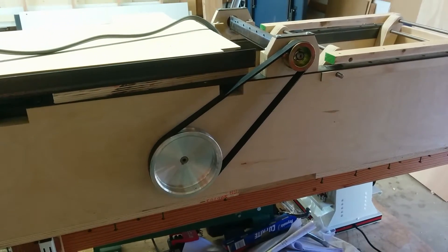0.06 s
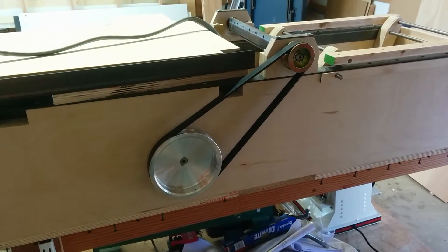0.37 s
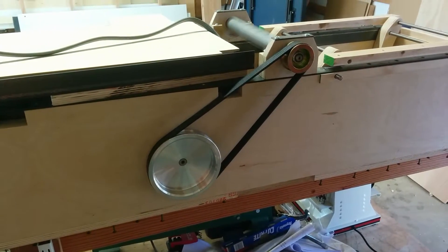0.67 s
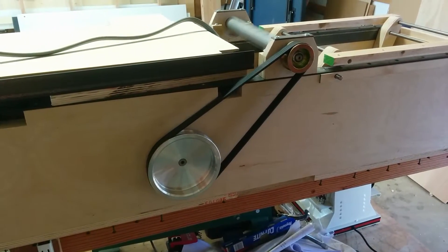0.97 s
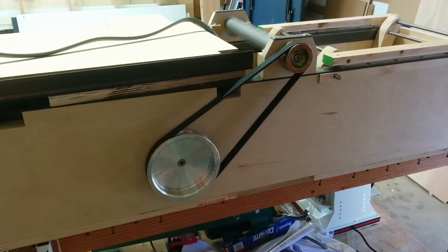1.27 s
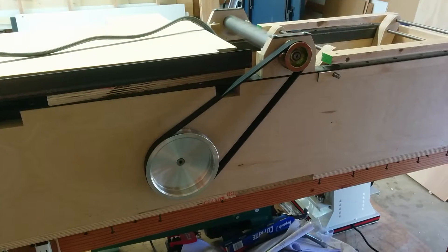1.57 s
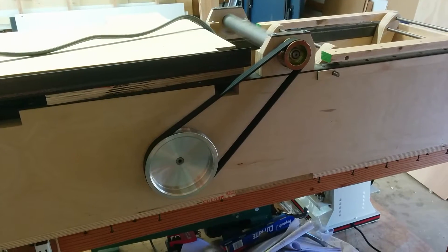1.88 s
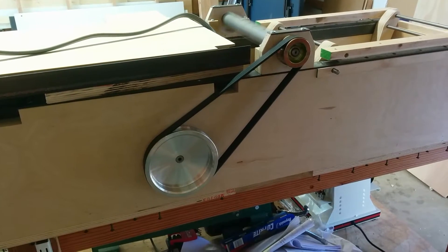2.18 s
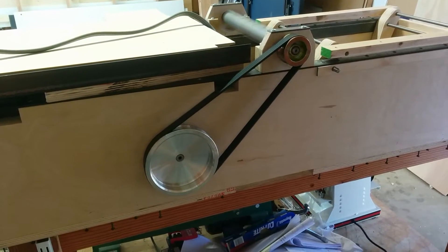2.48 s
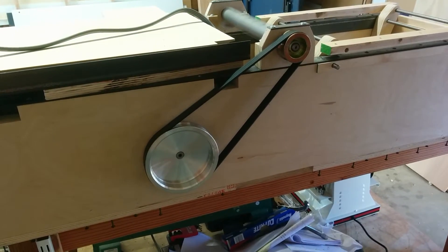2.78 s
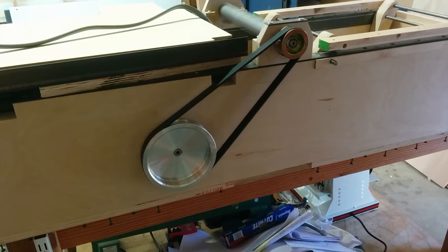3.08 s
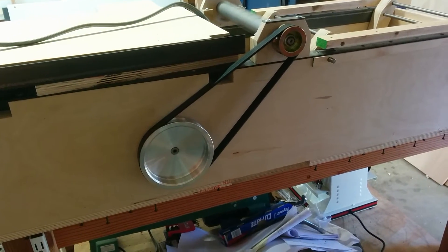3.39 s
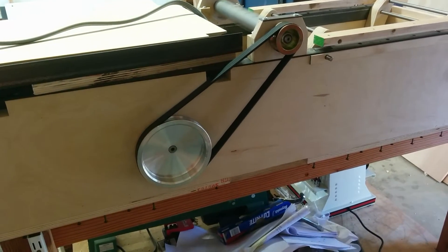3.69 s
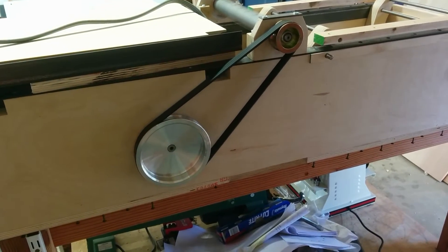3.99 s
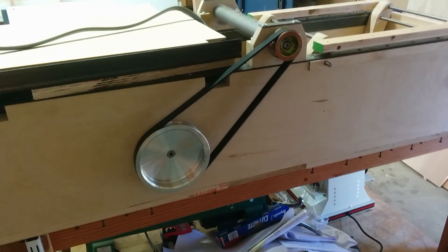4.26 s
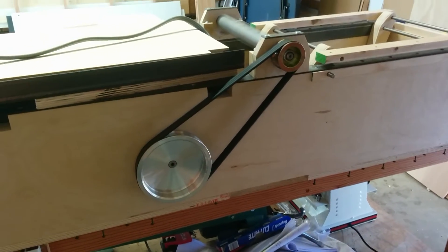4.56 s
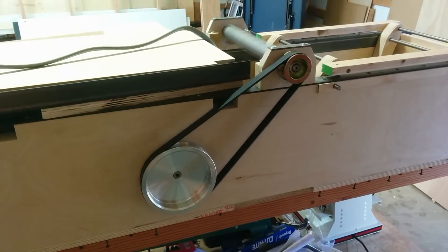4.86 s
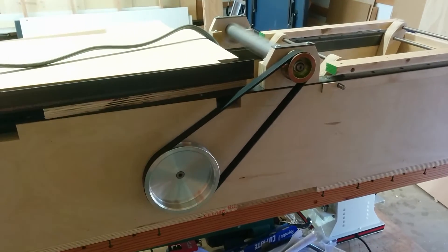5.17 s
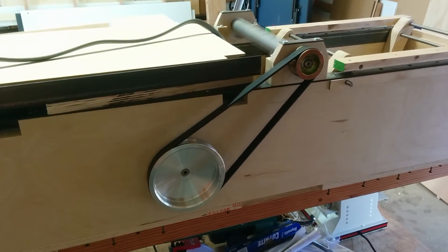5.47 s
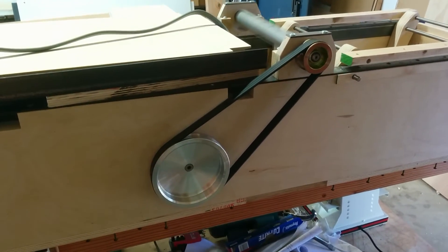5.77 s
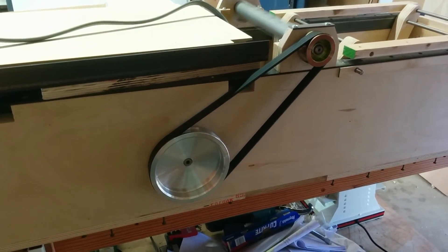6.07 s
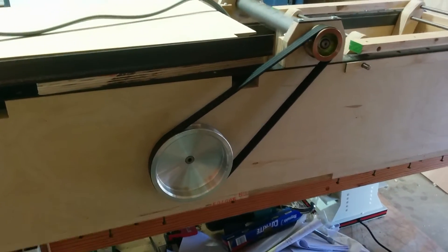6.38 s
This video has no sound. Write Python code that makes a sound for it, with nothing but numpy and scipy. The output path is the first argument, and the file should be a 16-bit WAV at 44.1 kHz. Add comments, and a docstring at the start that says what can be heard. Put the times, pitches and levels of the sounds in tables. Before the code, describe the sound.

In a quiet workshop, a switch snaps and an electric motor growls and whines quickly up to speed. Its drive belt squeals briefly and scuffs against the pulley for about a second before gripping. The machine then runs with a steady, throbbing hum, while its wooden frame rattles and knocks and the belt chirps and swishes unevenly, all heard from nearby.

```python
"""An induction motor starts up and drives the big pulley of a wooden woodworking machine by a V-belt.
Its switch snaps on, the inrush current growls, the rotor whines up and the starting switch drops out.
The belt squeals and slips until the pulley has caught up, then chirps and swishes in its groove.
Shafts, bearings and mains hum beat against each other while the frame rattles, in a small workshop."""
import sys
import numpy as np
from scipy import signal
from scipy.fft import rfft, irfft
from scipy.io import wavfile

SR = 44100
rng = np.random.default_rng(int(sys.argv[2]) if len(sys.argv) > 2 else 0)


def pcm_store(signal):
    """Save signal as 16-bit PCM."""
    levels = np.round(np.clip(np.atleast_2d(signal), -1, 1) * 32767)
    wavfile.write(sys.argv[1], SR, levels.astype(np.int16).T)


N = 284004
T = np.arange(N) / SR
HZ = np.maximum(np.fft.rfftfreq(N, 1 / SR), 1)
MOTOR_HZ, PULLEY_HZ, MAINS_HZ, POWER_ON_S = 59.58, 28.812, 60, 0.574

# run-up of each shaft, the last row being full speed: time_s, relative_speed
MOTOR_SPEED = [(.574, 0.23), (.62, 0.19), (.68, .27), (.72, .35), (.765, 0.45), (.81, 0.54), (.87, .645),
               (.92, .77), (.98, 0.86), (1.08, 0.91)]
PULLEY_SPEED = [(.6, 0.011), (.8, 0.46), (1.0, .85), (1.15, 0.91)]
def run_up(speeds):
    """A shaft's share of its full speed."""
    return curve(speeds) / speeds[-1][1]

def inrush():
    """The starting current, 0-1: it stays high until the rotor is nearly up to speed."""
    return np.clip((T - POWER_ON_S) / 0.022, 0, 1) ** 2 * (1 - run_up(MOTOR_SPEED) ** 40)

# housing resonances that the whine sweeps through: pitch_hz, width_hz, lift_db
HOUSING_MODES = [(275, 30, 14), (375, 48, 9), (448, 27.5, 14.5), (560, 20, 14.5), (670, 52, 2),
                 (750, 25, 6.5), (880, 76, 3)]
# magnetic growl of the inrush current: mains_multiple, level_db
GROWL_HARMONICS = [(2, -17), (4, -5.5), (6, -7.5), (8, -22.5), (14, -34)]
def motor_start(motor):
    """Rotor bars whine upward, with sidebands from the pulsing field; the inrush current growls."""
    speed = run_up(MOTOR_SPEED)
    bars, field = 16 * motor, 2 * MAINS_HZ * T
    lower = undb(-9.5 + 11.5 * speed ** 2) * tone(bars - field + 0.17 * walk(37))
    upper = undb(-14) * tone(bars + field + 0.2 * walk(40))
    whine = tone(bars + 0.08 * walk(40)) + lower + upper
    whine *= undb(2 * tone(motor))  # the off-centre rotor thickens it once a turn
    whine = undb(-24 - 7.2 * speed) * resonate(whine, HOUSING_MODES)
    growl = sum(undb(db + 0.71 * walk(22)) * tone(k * MAINS_HZ * T + 0.075 * walk(44))
                for k, db in GROWL_HARMONICS)
    growl = undb(-18 - 3.6 * speed) * unit(growl)
    # the housing is too small to radiate deep bass
    return signal.sosfilt(signal.butter(4, 200, "high", fs=SR, output="sos"), inrush() * (whine + growl))

# tones of each shaft: turn_multiple, level_db
MOTOR_ORDERS = [(1, -59.5), (2, -48), (3, -49), (5, -42), (6, -39), (8, -47), (13, -51), (16, -52)]
PULLEY_ORDERS = [(7, -43.5), (10, -49.5), (12, -44.5), (13, -44), (14, -49), (16, -42), (19, -47.5),
                 (21, -50), (22, -52.5), (25, -52), (28, -56.5), (29, -53.5), (30, -53.5), (31, -48.5),
                 (33, -54.5), (43, -56.5), (44, -55)]
def shafts(motor, pulley):
    """Both shafts sing and throb with the frame, over a boom that beats at the 4th motor order."""
    orders = tones(motor, MOTOR_ORDERS, flutter_db=1.5) + tones(pulley, PULLEY_ORDERS, flutter_db=4)
    boom = undb(-32 + 1.7 * walk(6.2)) * surge() * load(0.65) * tone(4 * motor, boom_beat())
    return throb(0.33) * load(0.8) * lull(0.48) * orders + boom

BEARING_HZ, PULLEY_BEARING_HZ, WHISTLE_HZ = 151.4, 467.2, 2622
# faint bearing tones and high motor harmonics at full speed: pitch_hz, level_db
FAINT_TONES = [(302.7, -40), (434.1, -45.5), (592.3, -49), (715, -52), (756.8, -53.5), (808, -55.5),
               (934.4, -53), (953.3, -51.5), (1192.5, -53), (1312, -57.5), (1497, -63.5), (1728, -63)]
# faders of the three lead tones: time_s, motor_bearing_db, hum_db, pulley_bearing_db
LEAD_LEVELS = [(1.15, -27, -44, -33), (1.96, -28.5, -27, -36), (2.75, -36.5, -39.5, -36),
               (3.15, -33.5, -31, -40), (4.66, -39.5, -33, -39), (5.05, -38, -40.5, -38),
               (5.64, -31, -30.5, -35), (5.95, -36.5, -41, -29.5), (6.44, -28.5, -50, -27)]
def running_tones(motor):
    """Bearings, high motor harmonics and a whistle follow the speed; the magnetic hum holds its pitch."""
    spin = motor / MOTOR_HZ
    faint = tones(spin, FAINT_TONES, flutter_db=4) + undb(-46.5) * tone(2 * MAINS_HZ * T)
    leads = (tone(BEARING_HZ * spin, drone_beat()), tone(6 * MAINS_HZ * T, lull(1)),
             tone(PULLEY_BEARING_HZ * spin))
    swelling = sum(undb(curve(LEAD_LEVELS, i) + 3 * walk(21)) * x for i, x in enumerate(leads, 1))
    whistle = undb(-53.5 + 1.7 * walk(6.9)) * load(1) * tone(WHISTLE_HZ * spin)
    return throb(0.11) * lull(0.26) * faint + swelling + whistle

# the motor under strain: pitch_hz, level_db (relative to the belt's scuffing)
STRAIN_TONES = [(301.5, -3), (468.3, -6), (1190.5, -9.5), (1238, -10), (1265, -13.5), (2762, -19.5),
                (3187, -17), (3741, -21.5), (4753, -24.5)]
def motor_strain(motor):
    """The motor sings extra tones while it strains against the slipping belt."""
    singing = tones(motor / MOTOR_HZ, STRAIN_TONES, flutter_db=1.5)
    return undb(curve(SLIP_LEVELS)) * (1 - inrush()) * singing

# faders of the slipping belt: time_s, scuff_db, hiss_db
SLIP_LEVELS = [(1.0, -32, -30.5), (1.55, -33.5, -32), (1.66, -33, -29.5), (1.8, -34, -36.5),
               (1.97, -33.5, -37), (2.05, -37, -47.5), (2.21, -38, -53), (2.3, -49, -49), (2.9, -67, -82),
               (3.4, -88, -100)]
# tone colour of the slip: frequency_hz, level_db
SLIP_EQ = [(620, -39), (1050, -5.5), (1220, -2), (1620, -8.5), (2310, -8), (2580, -4), (2900, -9.5),
           (3150, -8.5), (3510, -16), (3810, -13.5), (4890, -14.5), (6280, -24), (6730, -30),
           (16000, -61.5)]
def belt_slip(motor):
    """The belt scuffs on the motor pulley; the hiss above the crossover comes later and dies sooner."""
    speed = curve(MOTOR_SPEED)
    friction = colour(bursts(motor, depth_db=0.8), SLIP_EQ)
    scuff = signal.sosfiltfilt(signal.butter(3, 3250, fs=SR, output="sos"), friction)
    hiss = friction - scuff + undb(-22) * ring(noise(), PULLEY_MODES[:4])
    return (undb(curve(SLIP_LEVELS)) * speed ** 0.48 * scuff
            + undb(curve(SLIP_LEVELS, 2)) * speed ** 1.1 * hiss)

def slipping(grip_s=1.64, fall_db_per_s=27.5):
    """Share of the belt's slip that is left: 1 until it grips, then falling to 0."""
    return undb(-fall_db_per_s * np.maximum(T - grip_s, 0))

# short belt squeaks: centre_s, half_length_s, pitch_hz, level_db
SQUEAKS = [(0.739, 0.011, 1236, -26.5), (0.785, 0.055, 815, -26)]
def belt_squeal(sag_hz_per_s=300):
    """The belt squeaks as it takes up the pull, then squeals at the hardest pull, rising in pitch."""
    squeaks = sum(undb(db) * swell(s, width) * tone(turns(hz - sag_hz_per_s * (T - s)))
                  for s, width, hz, db in SQUEAKS)
    pitch_hz = (1313 + 1906 * curve(MOTOR_SPEED)) * (1 + 0.06 * walk(400))
    return squeaks + undb(-33.5 + 2.5 * walk(90)) * swell(0.934, 0.075) * tone(turns(pitch_hz))

# the belt rides against the groove wall: peak_s, hiss_db, chirp_db
SWISHES = [(2.15, -82, -54), (2.48, -70, -58), (2.78, -66.5, -76), (3.05, -58.5, -49.5),
           (3.26, -56.5, -48.5), (3.43, -68, -61), (3.59, -58, -49.5), (3.91, -63.5, -50),
           (4.13, -64.5, -54), (4.41, -63.5, -47), (4.73, -67, -50), (4.97, -64, -50), (5.26, -60, -52),
           (5.51, -58, -51), (5.74, -60, -46.5), (5.94, -62, -44.5), (6.15, -62, -41), (6.42, -61, -43)]
def swish_gain(column, rise_s=0.079, fall_s=0.1):
    """Uneven swishes, each coming a little faster than it leaves."""
    return sum(undb(row[column]) * swell(row[0], np.where(T < row[0], rise_s, fall_s), order=3)
               for row in SWISHES)

# tone colour of the chirping: frequency_hz, level_db
CHIRP_EQ = [(760, -43), (1300, -8.5), (1380, -15), (1550, -10), (1630, -7.5), (2160, -5.5), (2710, 0.5),
            (3370, -10.5), (3860, -12.5), (4470, -20), (5560, -28), (6000, -57), (7800, -63.5),
            (13200, -120)]
# resonances of loose fittings: pitch_hz, width_hz, level_db
FITTING_MODES = [(1240, 100, 1.5), (1520, 42, -7.5), (2595, 85, 0.5), (2795, 41, -9.5), (3900, 280, -14)]
def belt_chirp(pulley):
    """The gripping belt chirps, most at one place of the pulley's turn; loose fittings chatter along."""
    grip = curve(PULLEY_SPEED) ** 4 * (1 - 0.8 * slipping())
    level = (swish_gain(2) + undb(-44) * load(0.84)) * undb(1.2 * walk(14))
    chirps = grains(per_s=650, lo_hz=1158, hi_hz=4400, decay_s=0.0045, glide=0.6, spread_db=3)
    friction = chirps + undb(-1) * noise() + undb(1) * per_turn(pulley, PULLEY_HZ)
    friction *= undb(tone(pulley))
    chatter = undb(-5 + 2.8 * walk(45)) * ring(noise() + per_turn(pulley, PULLEY_HZ), FITTING_MODES)
    return level * grip * (colour(friction, CHIRP_EQ) + chatter)

# tone colour of the swish: frequency_hz, level_db
SWISH_EQ = [(2650, -29.5), (4500, -3.5), (5360, -3.5), (6150, 1), (6660, -2), (7370, -1.5), (8370, -8.5),
            (11000, -14.5), (13000, -22.5), (15200, -49)]
# resonances of the metal pulley: pitch_hz, width_hz, level_db
PULLEY_MODES = [(4510, 83, -3.5), (4640, 70, 5.5), (6190, 74, 6.5), (6240, 130, -4), (7290, 110, -1.5),
                (7990, 70, -8.5), (8760, 90, -7), (9520, 36, -6)]
def belt_swish(pulley, brush_s=2.972):
    """The belt hisses round and rings the pulley; from brush_s on it keeps brushing the groove wall."""
    level = swish_gain(1) + undb(-69) + undb(-72.5) * (T > brush_s) + undb(curve(SLIP_LEVELS, 2) - 25.5)
    hiss = colour(bursts(pulley, depth_db=0.8), SWISH_EQ)
    metal = undb(-7) * ring(noise(), PULLEY_MODES)
    return level * curve(PULLEY_SPEED) ** 4 * unit(hiss + metal)

# the frame's main, low and middle resonances: pitch_hz, width_hz, level_db
BOOM_MODES = [(241.5, 15, 0)]
DRONE_MODES = [(120, 13, -11), (146, 7.9, -1.5), (175, 36, -9)]
FRAME_MODES = [(299.6, 20, -5), (357.2, 18.7, -2.5), (381.5, 33, -1.5), (423, 66, -9.5)]
# tone colour of the low thudding: frequency_hz, level_db
THUD_EQ = [(20, -1), (40, 8.5), (60, 10.5), (75, 16), (100, 1), (140, 2.5), (250, -41)]
def frame_rumble():
    """The shafts and the inrush shake the wooden frame, which booms, drones and thuds."""
    speed, push = curve(MOTOR_SPEED), noise()
    boom = undb(-39) * throb(0.96) * load(0.76) * ring(push, BOOM_MODES)
    drone_gain = undb(-38) * np.abs(drone_beat()) * load(0.39) + undb(-28) * inrush() * speed ** 2
    drone = drone_gain * speed * ring(push, DRONE_MODES)
    body_gain = undb(-34.5 + 2 * walk(14)) * throb(0.14) * load(0.37) * lull(0.94) * speed
    body = (body_gain + undb(-37) * inrush()) * ring(push, FRAME_MODES)
    thud = undb(-59) * throb(0.25) * load(0.29) * speed ** 2 * colour(noise(), THUD_EQ)
    return boom + drone + body + thud

# side panel resonances: pitch_hz, width_hz, level_db
LARGE_PANELS = [(570, 160, -1.5), (715, 32, -7)]
SMALL_PANELS = [(798, 57, 2.5), (931, 80, 0.5), (1250, 280, -11), (1670, 980, -13.5)]
# louder fits of rattling: centre_s, half_length_s, large_panels_db, small_panels_db
RATTLES = [(0.79, 0.18, -42, -47), (0.946, 0.046, -42, -40), (1.7, 0.16, -47, -46),
           (2.807, 0.019, -40, -50), (4.08, 0.041, -57, -37.5), (4.253, 0.094, -63, -40.5),
           (5.322, 0.18, -48, -53)]
def panel_rattle(motor, pulley):
    """Loose panels clatter a little differently on every turn of the shafts."""
    repeating = undb(-1) * per_turn(pulley, PULLEY_HZ) + undb(-4) * per_turn(motor, MOTOR_HZ)
    taps = grains(per_s=260, lo_hz=600, hi_hz=1702, decay_s=0.0055, glide=0.15, spread_db=2.5)
    clatter = repeating + undb(-4.5) * bursts(pulley, depth_db=3.5) + undb(-5.5) * taps
    steady = load(0.58) * undb(1.43 * walk(16))
    large = undb(-40.5) * steady + sum(undb(db) * swell(s, width) for s, width, db, _ in RATTLES)
    small = undb(-41) * steady + sum(undb(db) * swell(s, width) for s, width, _, db in RATTLES)
    return large * ring(clatter, LARGE_PANELS) + small * ring(clatter, SMALL_PANELS)

# blows of the frame on its stand: start_s, frame_db, panels_db
KNOCKS = [(0.61, -12, -21), (1.178, -18, -47), (2.63, -15.5, -37), (2.806, -27.5, -28), (2.868, -31, -23.5),
          (2.942, -29, -26), (3.105, -17, -44), (3.239, -20.5, -51), (3.436, -19, -33), (3.644, -18.5, -43),
          (4.024, -21.5, -21), (4.196, -23, -37), (4.245, -17.5, -44), (4.66, -21, -46),
          (4.857, -31, -25.5), (5.293, -27, -27), (5.628, -16.5, -28), (6.379, -29, -23)]
# soft ticks as the belt comes free of the groove: start_s, level_db
BELT_TICKS = [(3.861, -30), (4.938, -28), (5.362, -33), (5.66, -31.5), (5.87, -28), (6.153, -25),
              (6.392, -26)]
def knocks():
    """Single blows ring the frame and its panels; the belt's ticks ring the fittings."""
    panels = LARGE_PANELS + SMALL_PANELS
    blows = sum(undb(frame_db) * strike(s, FRAME_MODES) + undb(panels_db) * strike(s, panels)
                for s, frame_db, panels_db in KNOCKS)
    return undb(1) * blows + sum(undb(db) * strike(s, FITTING_MODES) for s, db in BELT_TICKS)

# ring of the switch lever: pitch_hz, level_db, t60_s
LEVER_MODES = [(1510, -23, 0.012), (3060, -12, 0.015), (6100, -28, 0.012), (8370, -14.5, 0.0075)]
# switch housing resonances: pitch_hz, width_hz, level_db
SWITCH_MODES = [(1390, 1600, 4.5), (3120, 660, -6), (4520, 1800, -26), (6040, 1600, 0.5), (8200, 410, -19),
                (12200, 880, -32), (12100, 7000, -18)]
# clicks and soft low thumps: start_s, level_db, low_hz, high_hz, t60_s
CLICKS_AND_THUMPS = [(0.191, -57.5, 3220, 3900, 0.017), (0.191, -62, 1190, 2600, 0.04),
                     (.567, -45, 486, 3000, 0.042), (0.574, -17, 300, 15000, 0.017),
                     (.597, -42, 5500, 8900, 0.031), (.68, -57, 25, 90, .15),
                     (0.972, -37, 6400, 15020, 0.069), (0.989, -40, 6500, 15000, .05),
                     (1.447, -38, 25.07, 90, .12)]
def clicks_and_thumps(attack_s=0.00035, room_t60_s=0.17):
    """The power switch snaps on and the centrifugal switch clacks open; two soft low thumps sound."""
    age = np.maximum(T - POWER_ON_S, 0)
    lever = sum(undb(db - 60 * age / t60) * np.sin(2 * np.pi * hz * age) for hz, db, t60 in LEVER_MODES)
    out = lever * (1 - np.exp(-age / attack_s))
    for s, db, lo, hi, t60 in CLICKS_AND_THUMPS:
        age = np.maximum(T - s, 0)
        crack, tail = undb(-60 * age / t60), undb(-17 - 60 * age / room_t60_s)
        envelope = (1 - np.exp(-age / attack_s)) * (crack + tail)
        band = signal.butter(3, [lo, hi], "band", fs=SR, output="sos")
        out += undb(db) * envelope * unit(signal.sosfilt(band, ring(noise(), SWITCH_MODES)))
    return out

# tone colour of the workshop: frequency_hz, level_db
ROOM_EQ = [(25, -5.5), (60, -14), (101, -2), (213, -14.5), (264, -2), (475, -8), (749, -5), (2780, -21.5),
           (11800, -26), (15000, -27)]
def room_tone():
    """A faint, steady bed of low noise."""
    return undb(-75) * colour(noise(), ROOM_EQ)

# how hard the machine labours: time_s, level_db
LOAD = [(1.1, -27), (1.22, -29), (1.59, -26), (3.32, -37), (4.18, -39), (4.46, -38), (5.99, -33),
        (6.44, -29.5)]
def load(share):
    """Gain that follows a share of the machine's load."""
    db = curve(LOAD)
    return undb(share * (db - np.median(db)))

# the shaking builds up or eases off: centre_s, half_length_s, gain_db
SURGES = [(1.204, 0.22, 4.5), (1.777, 0.13, 3.5), (2.03, 0.059, -12), (2.8, 0.06, 10), (3.326, 0.05, -18),
          (3.689, 0.058, 6.5), (4.135, 0.22, 9), (4.73, 0.066, 5.5), (5.288, 0.055, 7), (5.85, 0.093, -8)]
def surge():
    """Gain of the slow swells and dips in the shaking."""
    return undb(sum(db * swell(s, width) for s, width, db in SURGES))

# the frame's middle resonances fall quiet: centre_s, half_length_s, gain_db
LULLS = [(2.354, 0.03, -16), (2.507, 0.027, -12), (2.734, 0.047, -10), (3.353, 0.045, -24),
         (3.54, 0.09, -6), (4.95, 0.091, -9), (5.194, 0.11, -7)]
def lull(share):
    """Gain that follows a share of the frame's quiet moments."""
    return undb(share * sum(db * swell(s, width) for s, width, db in LULLS))

def throb(share):
    """Gain that follows a share of the frame's shaking: the shafts' beat on the slow surge."""
    return (surge() * np.abs(boom_beat())) ** share

def boom_beat():
    """The frame booms when the 4th motor order and the 8th pulley order come into step."""
    return beat(4 * MOTOR_HZ - 8 * PULLEY_HZ, peak_s=3.024, depth=0.79)

def drone_beat():
    """The motor bearing drones against the 5th pulley order."""
    return beat(BEARING_HZ - 5 * PULLEY_HZ, peak_s=3.094, depth=0.62)

def beat(hz, peak_s, depth):
    """Complex envelope of a tone and a weaker partner hz below it, which grows as the belt grips."""
    return 1 + depth * (1 - 0.7 * slipping()) * np.exp(-2j * np.pi * hz * (T - peak_s))

def undb(db):
    """Decibels to gain."""
    return 10 ** (np.asarray(db) / 20)

def unit(x):
    """Scale to rms 1."""
    return x / np.std(x)

def curve(rows, column=1):
    """One column of a table, joined by straight lines in time."""
    rows = np.array(rows)
    return np.interp(T, rows[:, 0], rows[:, column])

def swell(s, width_s, order=2):
    """A bell-shaped rise and fall around one moment; a higher order gives steeper sides."""
    return np.exp(-np.abs((T - s) / width_s) ** order)

def noise():
    """White noise."""
    return rng.standard_normal(N)

def walk(hz):
    """Random drift with spread 1, moving about hz times a second."""
    return unit(irfft(rfft(noise()) / (1 + (HZ / hz) ** 4), N))

def colour(x, points):
    """Shape x with an EQ curve of (Hz, dB) points, at rms 1."""
    hz, db = np.transpose(points)
    return unit(irfft(rfft(x) * undb(np.interp(np.log(HZ), np.log(hz), db)), N))

def ring(x, modes):
    """Pass x through steep resonances, at rms 1."""
    power = sum(undb(db) ** 2 / (1 + ((HZ / hz - hz / HZ) * hz / width / 1.46) ** 2) ** 2
                for hz, width, db in modes)
    return unit(irfft(rfft(x) * np.sqrt(power), N))

def resonate(x, modes):
    """Resonances that sound on after x has swept past them."""
    return sum((-1) ** k * undb(db) * signal.lfilter(*signal.iirpeak(hz, hz / width, fs=SR), x)
               for k, (hz, width, db) in enumerate(modes))

def strike(s, modes):
    """One soft blow sets resonances ringing; the wider ones die first."""
    out, start = np.zeros(N), int(s * SR)
    age = T[:min(SR // 4, N - start)]
    rings = 0
    for hz, width, db in modes:
        level = undb(db + 2 * rng.standard_normal())
        pitch_hz = hz * (1 + 0.0087 * rng.standard_normal())
        rings += level * np.exp(-np.pi * width * age) * np.sin(2 * np.pi * pitch_hz * age)
    rings *= 1 - np.exp(-age / 0.0015)
    out[start:start + len(age)] = rings / np.abs(rings).max()
    return out

def turns(hz):
    """Turns made so far at this rate."""
    return np.cumsum(hz) / SR

def tone(cycles, envelope=1):
    """A sine of rms 1 that starts anywhere in its cycle, times a (complex) envelope."""
    return np.sqrt(2) * np.imag(envelope * np.exp(2j * np.pi * (cycles + rng.random())))

def tones(cycles, rows, flutter_db):
    """Multiples (k, dB) of a rotation, each fluttering slightly."""
    flutter = [undb(flutter_db * walk(7.6)) for _ in range(5)]
    return sum(undb(db) * flutter[i % 5] * tone(k * cycles) for i, (k, db) in enumerate(rows))

def bursts(cycles, depth_db):
    """Noise that swells once a cycle."""
    return noise() * undb(depth_db * tone(cycles))

def per_turn(cycles, hz):
    """A rough pattern that comes round on every turn of a shaft running at about hz."""
    size = int(SR / hz)
    return unit(np.interp(cycles % 1, np.arange(size) / size, rng.standard_normal(size)))

def grains(per_s, lo_hz, hi_hz, decay_s, glide, spread_db):
    """Short chirps at random times and pitches, each bending up or down as it dies."""
    age = T[:SR // 16]
    envelope = age / decay_s * np.exp(-age / decay_s)
    out = np.zeros(N + len(age))
    for when, pitch, bend, size in rng.random((int(per_s * T[-1]), 4)):
        cycles = lo_hz * (hi_hz / lo_hz) ** pitch * age * (1 + glide * (2 * bend - 1) * age)
        level = undb(-spread_db * np.log(1 - 0.95 * size))
        start = int(when * N)
        out[start:start + len(age)] += level * envelope * np.sin(2 * np.pi * cycles)
    return unit(out[:N])

def scene():
    """The machine starts in a quiet workshop; motor and pulley count the turns of the two shafts."""
    motor = turns(MOTOR_HZ * run_up(MOTOR_SPEED) * (1 + 0.001 * walk(4.37)))
    pulley = turns(PULLEY_HZ * run_up(PULLEY_SPEED) * (1 + 0.00041 * walk(2.73)))
    running = curve(MOTOR_SPEED) ** 3 * (shafts(motor, pulley) + running_tones(motor))
    drive = motor_start(motor) + running + motor_strain(motor)
    belt = belt_slip(motor) + belt_squeal() + belt_chirp(pulley) + belt_swish(pulley)
    wood = frame_rumble() + panel_rattle(motor, pulley) + knocks()
    powered = np.clip((T - POWER_ON_S) / 0.024, 0, 1)
    return (powered * (drive + belt + wood) + clicks_and_thumps() + room_tone())[None]

def record(dry):
    """A steep low-pass takes off the very top."""
    return signal.sosfilt(signal.ellip(8, 0.2, 70, 15750, fs=SR, output="sos"), dry)

dry = scene()
out = record(dry)
pcm_store(out)
```